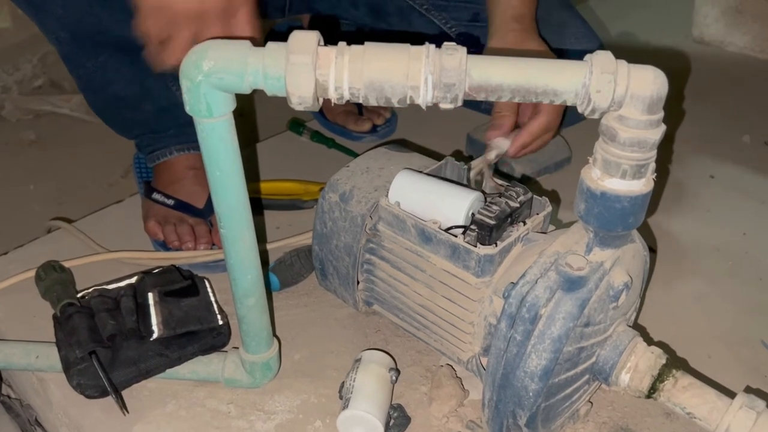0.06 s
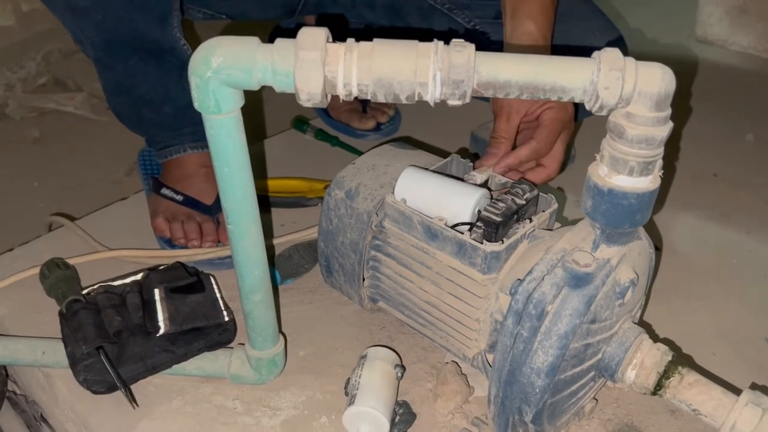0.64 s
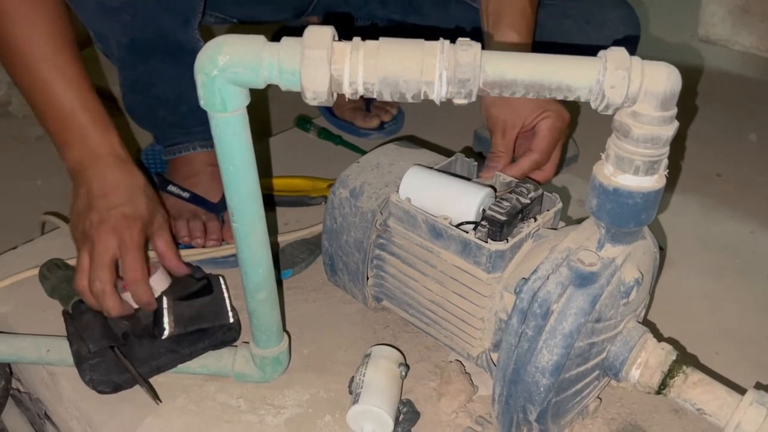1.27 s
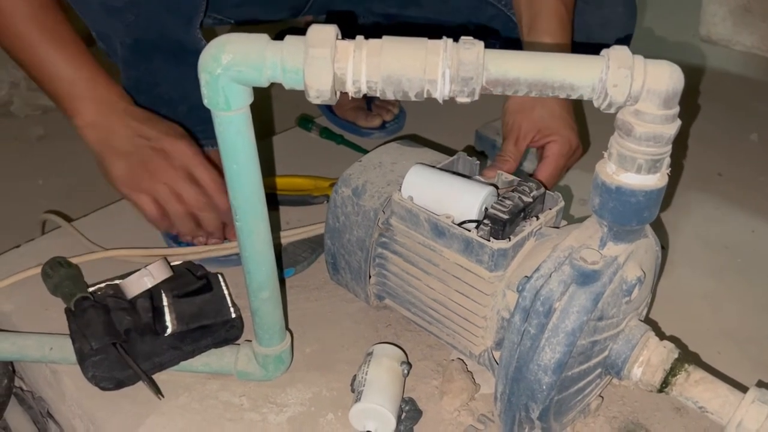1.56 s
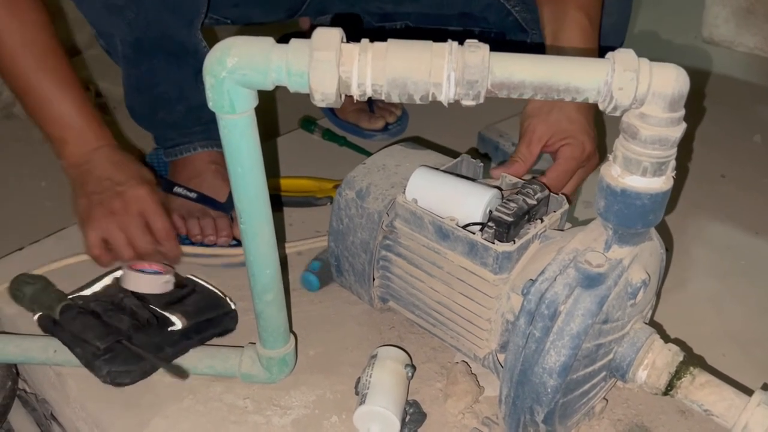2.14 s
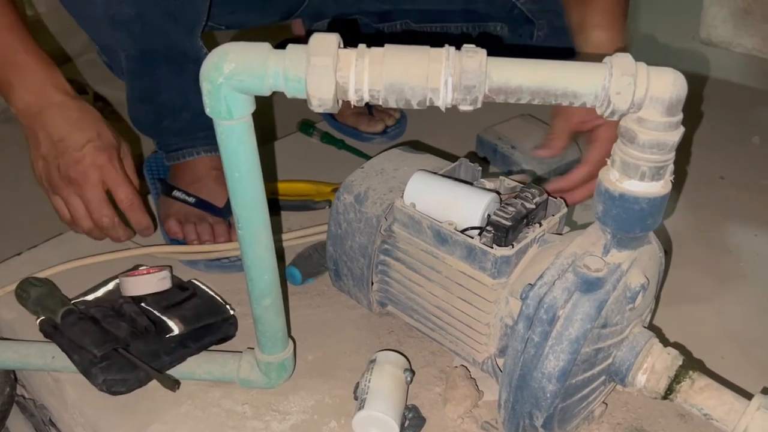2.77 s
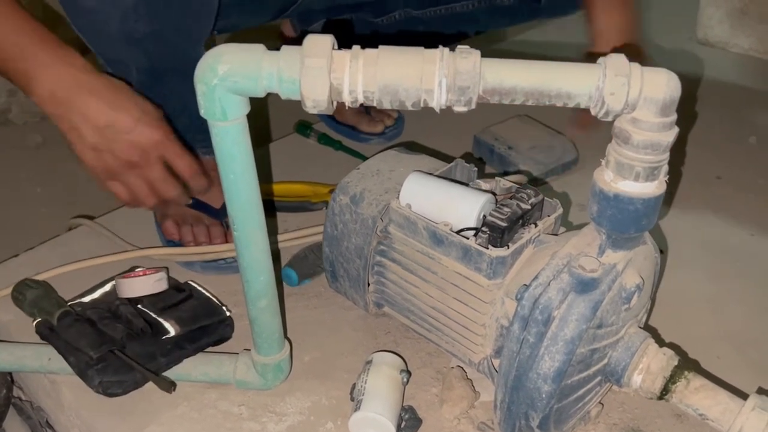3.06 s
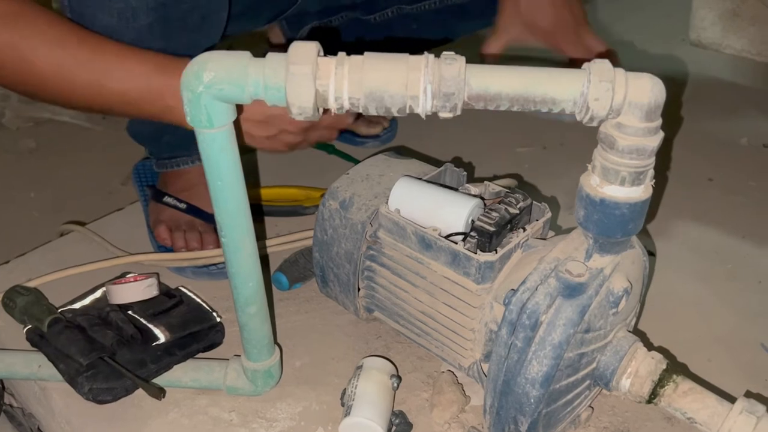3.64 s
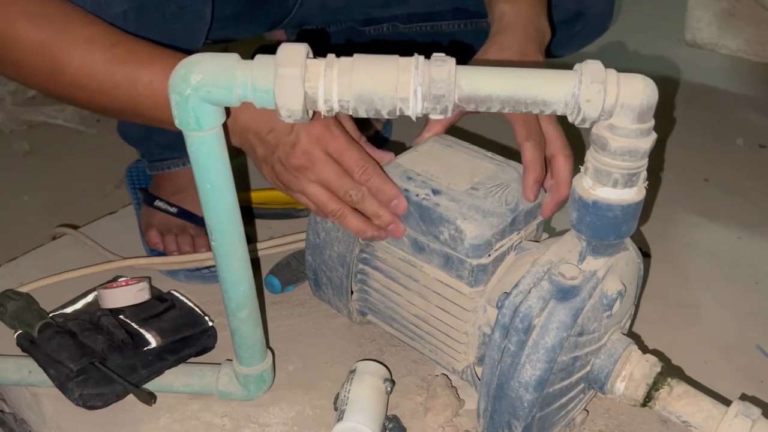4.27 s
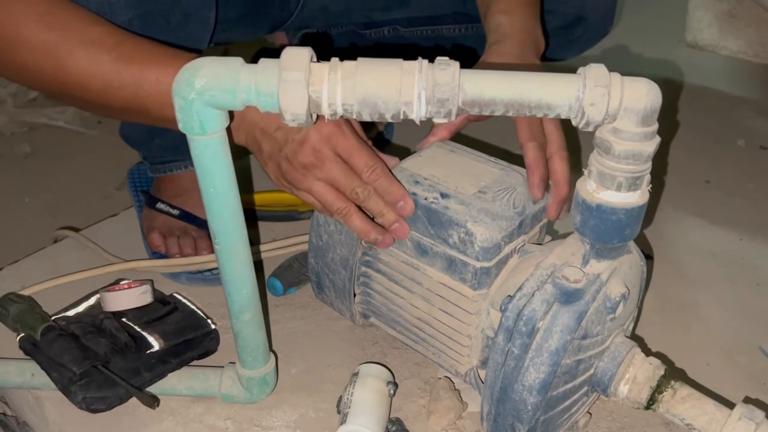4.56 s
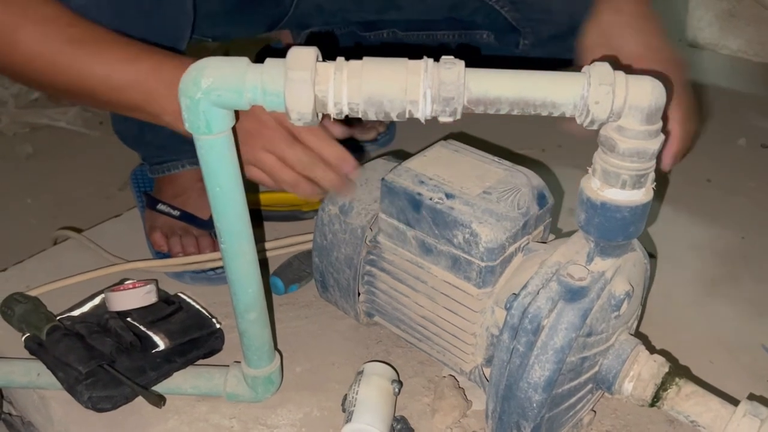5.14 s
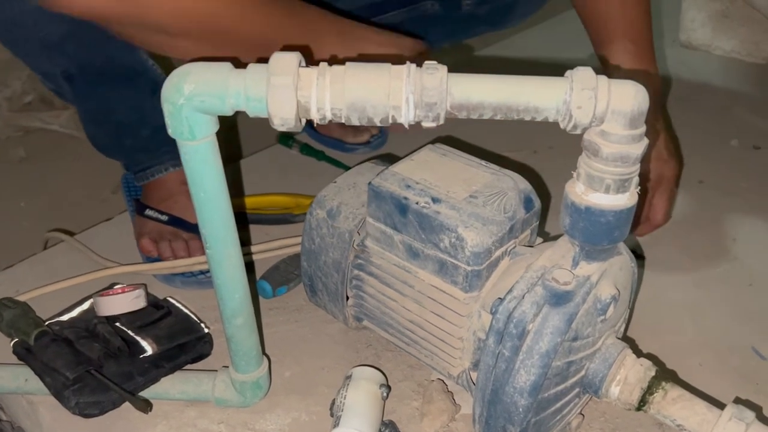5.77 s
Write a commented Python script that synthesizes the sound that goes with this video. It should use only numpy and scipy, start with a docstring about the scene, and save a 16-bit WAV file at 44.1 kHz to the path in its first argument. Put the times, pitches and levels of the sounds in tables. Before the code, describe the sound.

Over the steady hum and whine of a running pump motor, a few faint clicks lead to a cover clacking and scraping shut.

```python
"""Fitting a cover on a running pump

An electric water pump hums over a low rumble and a rush of air: shaft harmonics, a steady whine,
bearing whirr and a ringing housing. Close by, someone picks a terminal-box cover off the concrete,
claps it onto the pump housing and slides it until it seats. Each knock rings the shell and the air
under it, and dust crackles beneath the rim. Hands, clothes and small clicks fill in faintly."""
import sys
import numpy as np
from scipy import signal
from scipy.fft import rfft, irfft
from scipy.io import wavfile
from scipy.ndimage import uniform_filter1d, map_coordinates

SR = 44100
rng = np.random.default_rng(int(sys.argv[2]) if len(sys.argv) > 2 else 0)


def unload_audio(sound):
    """Save the sound as a 16-bit wav file, at the path given as the first command line argument."""
    columns = np.transpose(np.atleast_2d(sound))
    # keep every value between -1 and 1, then stretch to whole-number steps
    steps = np.round(np.clip(columns, -1, 1) * 32767)
    wavfile.write(sys.argv[1], SR, steps.astype(np.int16))


N = 265041
T = np.arange(N) / SR

SHAFT_HZ, SHRILL_HZ, CUTOFF_HZ = 47.755, 3000, 15800
SLIDE_START_S, SLIDE_END_S, SLIDE_ATTACK_S, SLIDE_RELEASE_S = 4.082, 4.525, 0.012, 0.022
OPEN_HZ, SEATED_HZ, CLOSING_S = 1070, 890, 0.15  # the hollow under the cover
HOLLOW_BOOST_DB, HOLLOW_REACH_HZ = 9.5, 30
RATTLE_LOSS_DB_PER_S, NOTE_SAG_HZ_PER_TOUCH = 550, 8.5

# stereo width of the noise: f/Hz, left-right correlation
NOISE_LIKENESS = [(40, 1), (80, .96), (170, .86), (350, .8), (700, .7), (1100, .35), (1600, 0), (2400, .5),
                  (4500, .6), (9200, .4), (11000, .1)]
# stereo lean of the noise: f/Hz, left-right/dB
NOISE_BALANCE = [(100, 0), (400, -1.5), (800, 3), (1200, 5.5), (2000, 0), (3500, 1), (6000, 5.5), (8500, 0)]
# colour of the machine's rumble: f/Hz, relative level/dB
RUMBLE_COLOUR = [(22, -28), (30, -12), (42, 7.5), (65, 5), (100, 5), (140, -2), (200, -3), (280, -12),
                 (400, -58)]
# colour of the rush of air: f/Hz, relative level/dB
RUSH_COLOUR = [(180, -10.5), (300, 0), (620, 3.5), (750, -0.5), (880, 1), (1070, -3.5), (1650, -4),
               (1950, -5.5), (2250, -5), (2550, -12), (2850, -17.5), (3100, -9), (3400, -13.5),
               (3650, -11.5), (4300, -17), (6600, -26), (8300, -21.5), (9400, -29.5), (11200, -29),
               (13000, -36), (15500, -32.5)]
# slow swells of groups of tones: low f/Hz, high f/Hz, crest t/s, period/s, depth/dB
TONE_SWELLS = [(500, 650, 4.6, 8, 1.5), (560, 590, 0.88, .96, 1.2), (560, 590, 1.2, 3.4, 1.2),
               (590, 610, 4.6, 3.2, 2), (840, 880, 5.6, 6, 2), (890, 930, 3.4, 6, 1.3),
               (1250, 1300, 5.6, 2.6, 1.8), (1700, 1790, 2, 7.5, 4), (2300, 2380, 1.0, 8.8, 4),
               (2400, 2450, 4.5, 5.6, 5), (2500, 2600, 5.8, 9, 2), (3800, 4000, 0.9, 6.5, 4.5),
               (4200, 4600, 0.8, 4.6, 5.5), (4800, 5000, 2.3, 7, 6.5), (7000, 8000, 5.7, 7.5, 7),
               (8900, 9500, 0.2, 11, 5)]
# resonances of the motor housing: f/Hz, width/Hz, level/dB
HOUSING_MODES = [(1266.5, 32, -51.5), (1530, 53, -51), (1806, 51, -55), (2450, 30, -56), (2536, 21, -58),
                 (4530, 71, -92)]
# colour of the bearing and rotor noise: f/Hz, relative level/dB
WHIRR_COLOUR = [(900, -5), (1250, 22), (1650, 27), (2100, 23), (2500, 19), (2850, 8), (4400, 13), (6500, 5),
                (9000, 4), (11000, -10), (16000, -30)]
# harmonics of the shaft: multiple, level/dB, left-right/dB
SHAFT_HARMONICS = [(1, -62, 0), (2, -53, 2), (3, -50, -1.5), (5, -57.5, 5), (6, -53.5, -7), (7, -44, 0.5),
                   (9, -50, 7), (10, -57, 7), (12, -44.5, -2.5), (18, -48.5, 3), (19, -55, 11),
                   (21, -63, 11), (24, -56.5, -10), (27, -52.5, 4), (30, -63, 10), (49, -59.5, 5),
                   (51, -58.5, 4), (53, -66, -2)]
# further steady hum and whine tones of the motor, most between the shaft harmonics:
# f/Hz, relative level/dB, left-right/dB
WHINE_TONES = [(36.3, -48, 0), (64.6, -42, 0), (71.3, -48, 0), (175, -55, 3), (262.4, -53, -6),
               (440.1, -53.5, 4), (600.2, -50, 1), (697, -56, 4), (800, -56.5, 3), (900.4, -41.5, 2),
               (959.6, -46.5, 13), (1001, -57, 3), (1147, -59, 3), (1719, -60, 2), (1771, -56.5, -1),
               (1819.6, -57, 8), (2046, -60, -3), (2919.6, -71, 2), (3537, -70, 2), (3818, -71, 2),
               (3913.7, -68, 1), (4208, -72, 4), (4266, -69.5, 5), (4362, -68, 4), (4498, -72, 6),
               (4556, -73, 5), (4850, -71, 5), (4888, -65.5, 7), (5045, -73, 2), (5082, -72, 7),
               (5182, -74, 4), (5430, -74, 4), (5630, -73.5, 5), (5823, -74, 7), (7187, -77, 5),
               (7418, -77, 4), (8996, -84, 0), (9189, -82, 0), (9385, -83, 0)]
# colour of brushing cloth: f/Hz, relative level/dB
CLOTH_COLOUR = [(1500, 0), (3500, 9), (6000, 5.5), (9000, 4.5), (11500, 1), (13000, -1), (16000, 0)]
# brushes of hands and cloth: t/s, half-length/s, level/dB
BRUSHES = [(1.187, .015, -53), (1.676, 0.029, -49), (1.8, .014, -58), (1.84, 0.04, -48.5),
           (2.03, 0.032, -56), (2.128, 0.035, -49.5), (3.233, .025, -52), (3.65, 0.035, -52),
           (4.805, 0.026, -49.5)]
# clicks of a tape roll and tools being put down: t/s, crack/dB, ring/dB, ring f/Hz, ring t60/s
TOOL_TAPS = [(1.177, -42, -41, 7500, .01), (1.788, -37, -40, 5800, .014), (2.032, -52, -41, 3940, .04),
             (2.1206, -48, -34, 3880, 0.057)]
# the cover's rim grinding over dust: t/s, half-length/s, level/dB
RIM_SCRAPES = [(4.1, .009, -50), (4.303, 0.0017, -40), (4.333, 0.0083, -46), (4.503, .004, -48),
               (4.5223, 0.0014, -42), (4.524, .009, -46)]
# modes of the cover's shell: f/Hz, relative level/dB, t60/s
SHELL_MODES = [(1095, -3, 0.043), (1490, -16, .022), (1715, -6, 0.035), (1945, -6, 0.026), (2130, -13, .02),
               (2340, -11, 0.026), (2665, -10, 0.03), (3270, -15, 0.022), (3665, -16, 0.028),
               (3865, -16, 0.023), (4395, -14.5, 0.03), (4960, -17, 0.015), (5530, -18, 0.028),
               (5880, -19.5, 0.024)]
# knocks of the cover, levels relative: t/s, level/dB, hollow f/Hz, shell ring/dB, tick/dB,
# left-right/dB, touches, bounce gap/s, contact brightness f/Hz
COVER_KNOCKS = [(3.3035, -10, 790, -12, -18, 3, 2, .0076, 3000),
                (3.3213, -16, 790, -16, -20, 3, 2, .0076, 2500),
                (4.0761, -7, 950, 0, -2, 6, 1, .0025, 2800),
                (4.0793, -9.5, 1000, 6, 15, 7, 2, .0019, 12000),
                (4.0836, 0, 980, -11, -6, 10, 1, .003, 2500), (4.1001, -17, 1060, -1, -3, 3, 1, .003, 7000),
                (4.2115, -18, 1050, -10, -10, 4, 1, .003, 2500),
                (4.3070, -11, 930, -1, 1, 6, 1, .003, 3200), (4.3104, -21, 900, 5, 10, 6, 2, .004, 3200),
                (4.3274, -14, 820, -5, 1, 5, 1, .003, 3500), (4.3311, -13, 810, -9, -3, 5, 1, .003, 2800),
                (4.4985, -18.5, 900, -4, -1, 6, 2, .0022, 2800),
                (4.5222, -26, 900, 7, 16, 5, 1, .003, 9000), (4.5248, -16.5, 740, 0, 4, 5, 2, .0036, 3000),
                (4.8012, -17, 570, -12, -4, 5, 2, .007, 8000)]


def from_db(db):
    """Decibels to gain."""
    return 10 ** (np.asarray(db) / 20)


def rms_one(x):
    """Scale to rms 1."""
    return x / np.sqrt(np.mean(x ** 2) + 1e-20)


def at_hz(points, hz):
    """Read a table on a log-frequency axis."""
    known_hz, values = np.transpose(points)
    return np.interp(np.log(hz + 1e-9), np.log(known_hz), values)


def pan(balance_db):
    """Left and right gains of unit mean power."""
    return rms_one(from_db(balance_db * np.array([[.5], [-.5]])))


def filtered(x, order, hz, kind="low"):
    """Smooth low-, high- or band-pass."""
    return signal.sosfilt(signal.butter(order, hz, kind, fs=SR, output="sos"), x)


def resonate(x, hz, width_hz):
    """Two-pole resonance with gain 1 at its peak."""
    r = np.exp(-np.pi * width_hz / SR)
    feedback = [1, -2 * r * np.cos(2 * np.pi * hz / SR), r * r]
    return signal.lfilter(np.array([1, 0, -1]) * (1 - r * r) / 2, feedback, x)


def drift(rate):
    """Smooth random modulation that changes about rate times a second."""
    coarse_t = np.linspace(0, T[-1], 4096)
    smooth = map_coordinates(rng.standard_normal(size=2048), [coarse_t * rate + 2], order=2, mode="wrap")
    return np.interp(T, coarse_t, smooth)


def bumps(events):
    """An envelope with one bell-shaped swell per event."""
    return sum(from_db(db) * np.exp(-.5 * ((T - s) / half_s) ** 2) for s, half_s, db in events)


def air_noise(colour):
    """Coloured stereo noise of rms 1, centred in the bass and wider above."""
    hz = np.arange(N // 2 + 1) * SR / N
    mid, side = rfft(rng.standard_normal((2, N)))
    alike = at_hz(NOISE_LIKENESS, hz)
    ears = np.array([[1], [-1]])
    pair = np.sqrt(1 + alike) * mid + np.sqrt(1 - alike) * side * ears
    level_db = at_hz(colour, hz) + ears * at_hz(NOISE_BALANCE, hz) / 2
    return rms_one(irfft(pair * from_db(level_db), N))


def machine_noise(rumble_db, rush_db, churn_db, beat_depth):
    """The bed: low rumble, and a rush that churns and pulses lightly with each turn of the shaft."""
    swell = from_db(churn_db * drift(35)) * (1 + beat_depth * np.sin(2 * np.pi * SHAFT_HZ * T))
    rumble = from_db(rumble_db) * air_noise(RUMBLE_COLOUR)
    return rumble + from_db(rush_db) * air_noise(RUSH_COLOUR) * swell


def swell_db(hz):
    """Slow rise and fall in the level of a tone."""
    return sum(depth_db * np.cos(2 * np.pi * (T - crest_s) / period_s)
               for low, high, crest_s, period_s, depth_db in TONE_SWELLS if low < hz < high)


def housing():
    """Random vibration rings the narrow resonances of the motor housing."""
    shake = air_noise([(500, 0), (5000, 0)])  # flat colour
    return sum(from_db(db + swell_db(hz)) * rms_one(resonate(shake, hz, width_hz))
               for hz, width_hz, db in HOUSING_MODES)


def whirr(turns, spread_rad, size=8192):
    """Bearing and rotor roughness comes round with each turn: a fine comb of uneven high harmonics."""
    hz = np.arange(size // 2 + 1) * SHAFT_HZ
    uneven_db = rng.uniform(-6, 6, len(hz))
    heights = from_db(at_hz(WHIRR_COLOUR, hz) + uneven_db) * (hz > 0) * (hz < CUTOFF_HZ)
    phases = 2 * np.pi * rng.random(len(hz)) + spread_rad * rng.standard_normal((2, len(hz)))
    one_turn = irfft(heights * np.exp(1j * phases))
    return rms_one(np.array([np.interp(turns % 1 * size, np.arange(size), ear) for ear in one_turn]))


def hum(speed_wander, waver_db, flutter_rad, left_lead_rad, drone_db, whine_db, whirr_db):
    """Wavering shaft harmonics and whine over whirr and housing; the speed wanders with the load."""
    clock = T + speed_wander * np.cumsum(drift(5)) / SR
    boost_db, note_hz = HOLLOW_BOOST_DB * drag_envelope(), hollow_note()
    tones = [(k * SHAFT_HZ, db, side_db) for k, db, side_db in SHAFT_HARMONICS]
    tones += [(hz, db + (whine_db if hz > SHRILL_HZ else drone_db), side_db)
              for hz, db, side_db in WHINE_TONES]
    out = from_db(whirr_db) * whirr(clock * SHAFT_HZ, spread_rad=0.91) + housing()
    for hz, level_db, side_db in tones:
        # while the cover slides, its hollow lifts the motor tones near its note
        lift_db = swell_db(hz) + boost_db / (1 + ((hz - note_hz) / HOLLOW_REACH_HZ) ** 2)
        phase = 2 * np.pi * (hz * clock + rng.random()) + flutter_rad * drift(22)
        # above the bass, the left ear leads in phase
        lead = left_lead_rad * np.clip((hz - 150) / 450, 0, 1) * np.array([[1], [0]])
        gain = np.sqrt(2) * from_db(level_db + lift_db + waver_db * drift(3.845))
        out += gain * pan(side_db) * np.sin(phase + lead)
    return out


def rustle(grain_db):
    """Short swells of grainy hiss as skin and cloth brush past."""
    return bumps(BRUSHES) * rms_one(air_noise(CLOTH_COLOUR) * from_db(grain_db * drift(250)))


def taps(crack_t60, spread_rad):
    """Small things set down lightly, each a brief crack and one short ringing note."""
    out = np.zeros((2, N))
    t = T[:SR // 5]
    for s, crack_db, ring_db, hz, t60 in TOOL_TAPS:
        burst = rng.standard_normal((2, len(t))) * from_db(-60 * t / crack_t60)
        crack = filtered(burst, 2, 4500, "high")
        ring = np.sin(2 * np.pi * hz * t + spread_rad * np.array([[1], [0]])) * from_db(-60 * t / t60)
        start = round(s * SR)
        out[:, start:start + len(t)] += from_db(crack_db) * crack + from_db(ring_db) * ring
    return out


def reflections(x, t60, gap_s, dull_hz):
    """A short, dull tail scattered back by the floor and nearby walls."""
    t = T[:SR // 2]
    echoes = rng.standard_normal((2, len(t))) * from_db(-60 * t / t60) * np.clip(t / gap_s - 1, 0, 1)
    echoes = rms_one(filtered(echoes, 1, dull_hz)) / np.sqrt(len(t))
    return signal.fftconvolve(x.mean(axis=0, keepdims=True), echoes, axes=1)[:, :N]


def scrapes(grains_per_s, spread_db, side_db):
    """Dust crushed under the rim crackles around the seating clacks."""
    sizes = from_db(spread_db * np.minimum(rng.exponential(1, N), 3))
    crushed = rng.random(N) < grains_per_s / SR
    grains = crushed * sizes * (rng.standard_normal(N) + rng.standard_normal((2, N))) + 1e-18
    return pan(side_db) * bumps(RIM_SCRAPES) * rms_one(filtered(grains, 2, [2500, 8000], "band"))


def drag_envelope():
    """How firmly the cover is being dragged, 0-1: attack, hold, release."""
    attack = np.clip((T - SLIDE_START_S) / SLIDE_ATTACK_S, 0, 1)
    return attack * np.exp(-np.maximum(T - SLIDE_END_S, 0) / SLIDE_RELEASE_S)


def hollow_note():
    """Pitch in Hz of the air under the sliding cover, sinking as the gap closes."""
    return SEATED_HZ + (OPEN_HZ - SEATED_HZ) * np.exp(-np.maximum(T - SLIDE_START_S, 0) / CLOSING_S)


def slide(level_db, slips_per_s, width_hz, soft_hz):
    """Dense, soft slips of the rim keep the hollow under the cover singing."""
    slips = (rng.random(N) < slips_per_s / SR) * rng.standard_normal(N) + 1e-18
    # a resonance that glides with the hollow's note
    carrier = np.exp(2j * np.pi * np.cumsum(hollow_note()) / SR)
    decay = np.exp(-np.pi * width_hz / SR)
    ringing = (carrier * signal.lfilter([1], [1, -decay], slips / carrier)).imag
    ringing = filtered(ringing, 1, [400, soft_hz], "band")
    # the hand presses evenly, so the note holds its level
    steady = ringing / np.sqrt(uniform_filter1d(ringing ** 2, size=SR // 50) + 1e-12)
    return from_db(level_db) * drag_envelope() * rms_one(steady)


def touches():
    """Unfold the knocks into single contacts; a bounce lands weaker and lower as the cover settles."""
    for s, level_db, note_hz, ring_db, hard_db, side_db, count, bounce_s, contact_hz in COVER_KNOCKS:
        for k in range(count):
            late_s = k * bounce_s
            touch_db = level_db - RATTLE_LOSS_DB_PER_S * late_s
            touch_hz = note_hz - NOTE_SAG_HZ_PER_TOUCH * k
            yield s + late_s, touch_db, touch_hz, ring_db, hard_db, side_db, contact_hz


def knocks(build_s, hollow_t60, shell_db, tick_db, tick_t60, tick_band_hz, spread_cycles):
    """Each contact pumps the air under the cover, rings its shell and gives a gritty tick."""
    out = np.zeros((2, N))
    t = T[:SR // 5]
    hollow_envelope = (1 - np.exp(-t / build_s)) * from_db(-60 * t / hollow_t60)
    for s, level_db, note_hz, ring_db, hard_db, side_db, contact_hz in touches():
        hollow = 2 * np.sin(2 * np.pi * note_hz * t) * hollow_envelope
        shell = np.zeros((2, len(t)))
        for hz, mode_db, t60 in SHELL_MODES:
            # each mode radiates its own way, reaching the ears part of a cycle apart
            age = np.maximum(t - (rng.random() + spread_cycles * rng.random((2, 1))) / hz, 0)
            shell += from_db(mode_db + rng.normal(0, 1.9) - 60 * age / t60) * np.sin(2 * np.pi * hz * age)
        grit = rng.standard_normal(len(t)) + .5 * rng.standard_normal((2, len(t)))
        tick = filtered(grit * from_db(-60 * t / tick_t60), 1, tick_band_hz, "band")
        clack = from_db(shell_db + ring_db) * shell + from_db(tick_db + hard_db) * tick
        clack = filtered(clack, 1, contact_hz)  # a soft contact is duller
        knock = pan(side_db) * hollow + pan(side_db / 2) * clack
        start = round(s * SR)
        out[:, start:start + len(t)] += from_db(level_db) * knock
    # the small, dusty cover radiates little bass and little top end
    return filtered(out, 2, [420, 11500], "band")


def scene():
    """The running motor as a bed, with the cover handled in front of it."""
    motor = hum(speed_wander=0.0002735, waver_db=1.0, flutter_rad=0.054, left_lead_rad=0.95,
                drone_db=-3.5, whine_db=-0.5, whirr_db=-51.0)
    motor += machine_noise(rumble_db=-36.5, rush_db=-38.0, churn_db=1.16, beat_depth=0.034)
    cover = knocks(build_s=0.0013, hollow_t60=0.015, shell_db=-6.5, tick_db=-14.0, tick_t60=0.0067,
                   tick_band_hz=[1400, 5000], spread_cycles=0.52)
    room = from_db(-15) * reflections(cover, t60=0.17, gap_s=0.007, dull_hz=5000)
    grit = scrapes(grains_per_s=7000, spread_db=7.0, side_db=1)
    hands = rustle(grain_db=1.5) + taps(crack_t60=0.011, spread_rad=1.2)
    drag = slide(level_db=-40.5, slips_per_s=2300, width_hz=140, soft_hz=2500)
    return motor + hands + room + grit + drag + cover


def record(dry):
    """Soft-clip the highest peaks and cut the very top."""
    rounded = 1.3 * np.tanh(dry / 1.3)
    return signal.sosfilt(signal.ellip(10, .1, 80, CUTOFF_HZ, fs=SR, output="sos"), rounded)


dry = scene()
out = record(dry)
unload_audio(out)
```